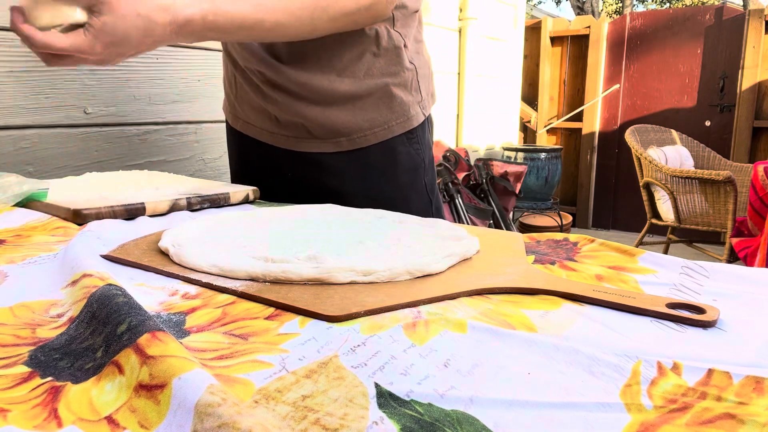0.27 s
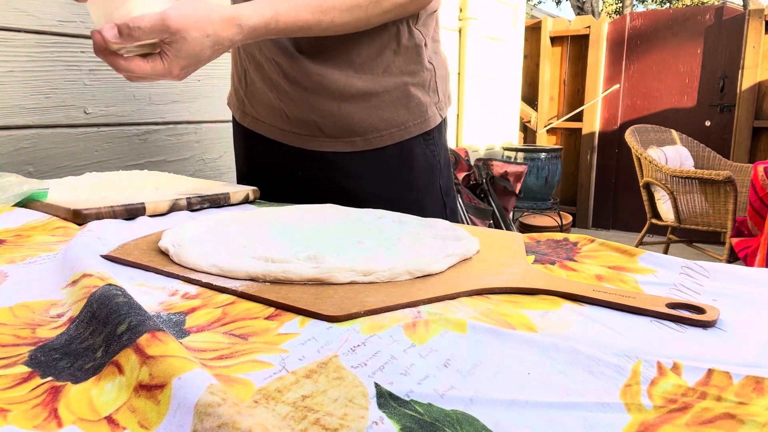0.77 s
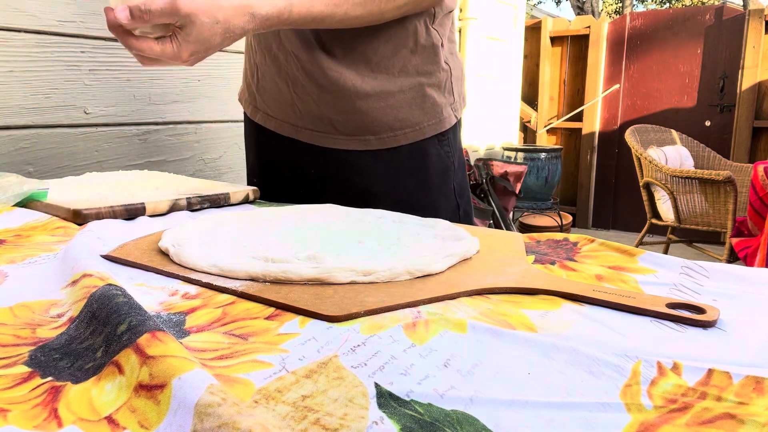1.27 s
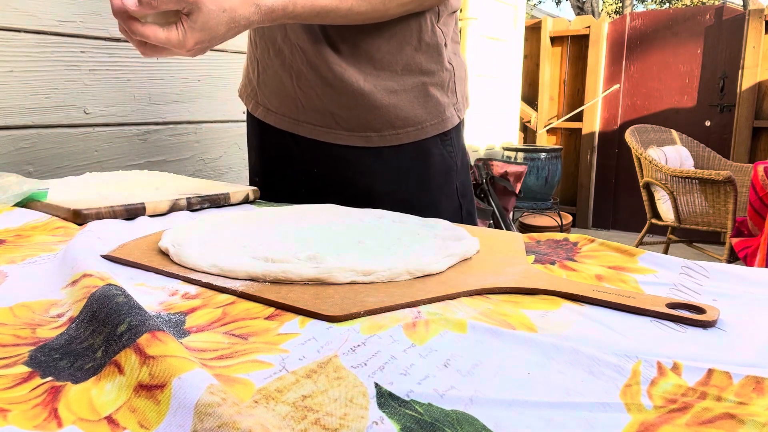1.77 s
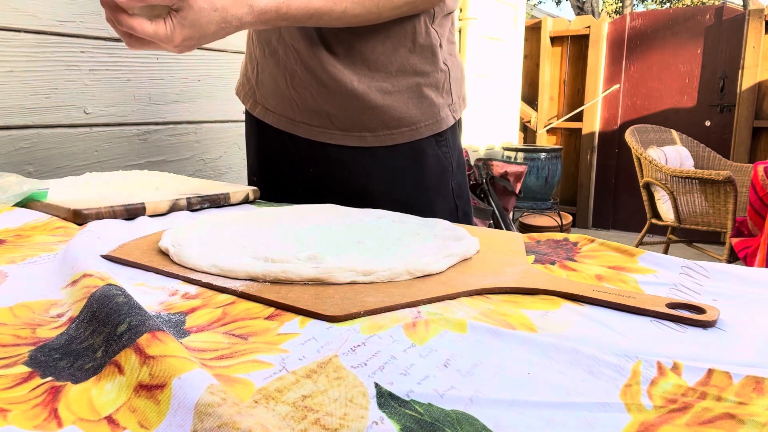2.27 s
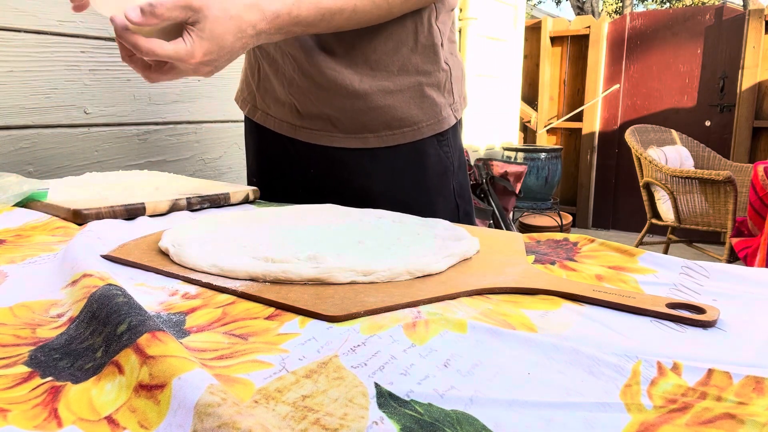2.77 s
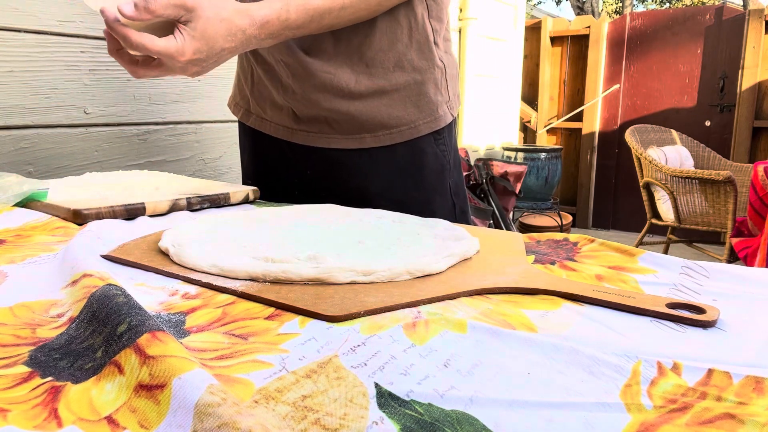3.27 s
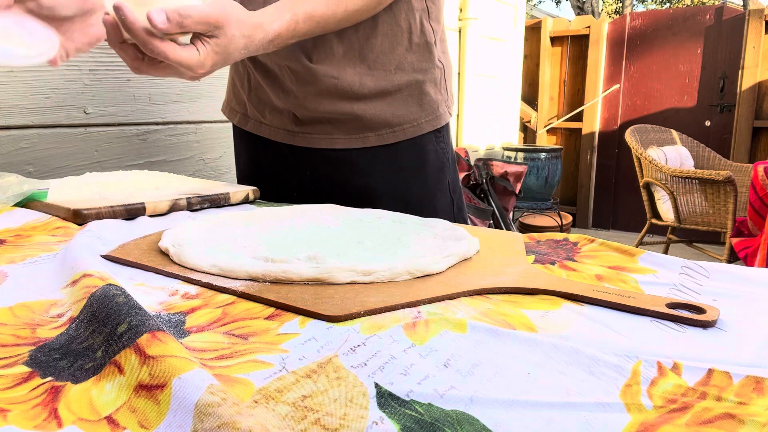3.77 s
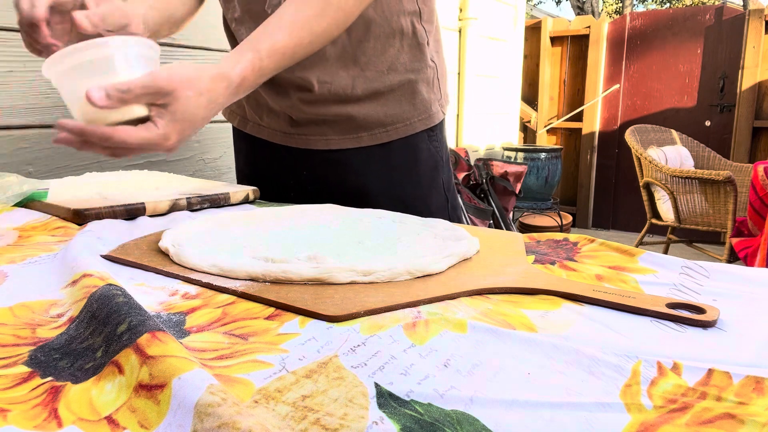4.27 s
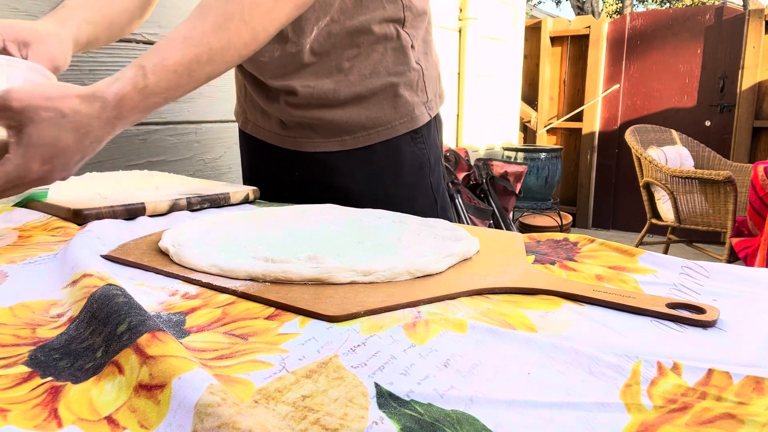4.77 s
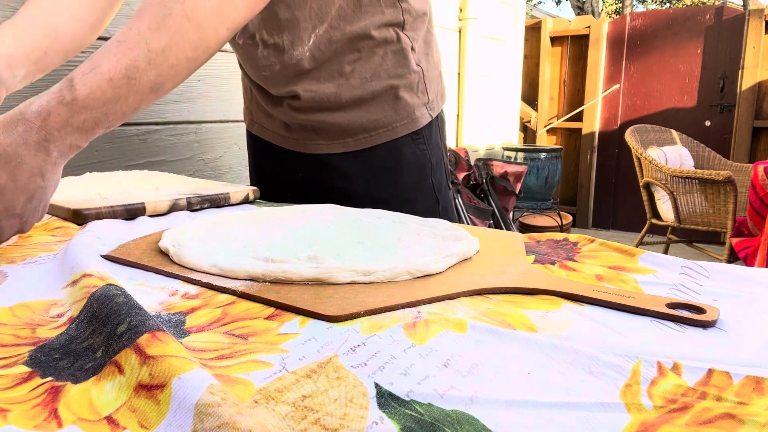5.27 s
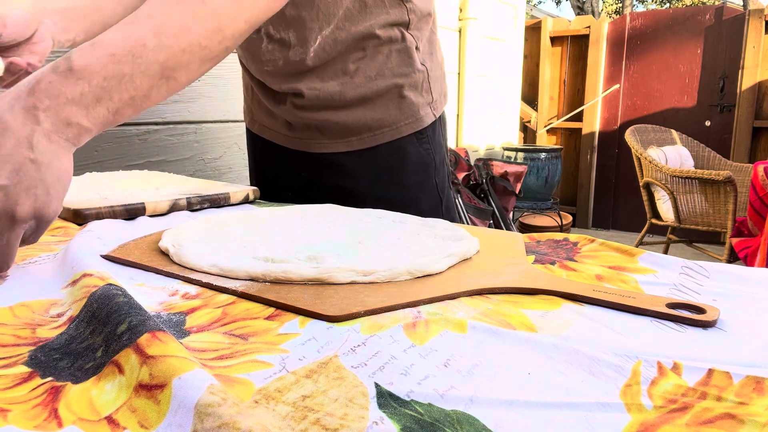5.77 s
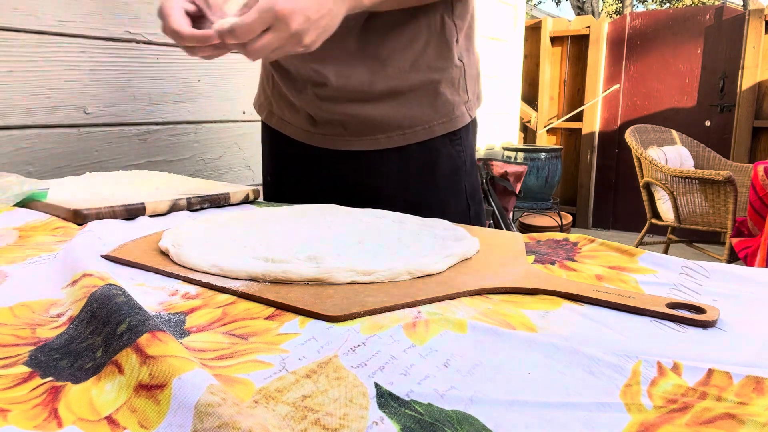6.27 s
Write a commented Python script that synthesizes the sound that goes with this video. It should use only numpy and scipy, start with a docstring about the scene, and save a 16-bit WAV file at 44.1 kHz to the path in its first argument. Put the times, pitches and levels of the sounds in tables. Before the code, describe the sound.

Quiet outdoor table work heard by a close stereo microphone. Soft skin-on-plastic strokes lead to a sudden lid pop at two seconds, a tight cluster of bright snaps past the middle, and a hard tumble of thuds and ticks as lid and tub land on the table. Faint squeaks, soft floury hiss and two duller bumps end it. Behind are low rumble, steady hum and a faraway power tool.

```python
"""Floury hands and a plastic tub outdoors

At an outdoor table, floured hands rub a thin plastic tub, prise off its lid and handle it with sharp snaps.
Strokes are shaped noise; snaps and their slaps from the house wall are bursts of slips over ringing modes;
the lid pop is a short rising swing in a brief hiss.
Lid and tub meet the cloth-covered table in dull knocks: falling thuds over ringing boards.
A motor hums in three partials; far off a power tool whines, sagging in pitch, and rasps over rumble and hiss.
"""
import sys
import numpy as np
from scipy import signal
from scipy.fft import rfft, irfft
from scipy.io import wavfile

SR = 44100
rng = np.random.default_rng(int(sys.argv[2]) if len(sys.argv) > 2 else 0)


def dump(signal):
    """Clip the signal to [-1, 1] and save it as 16-bit WAV at the path in sys.argv[1]."""
    limited = np.clip(np.atleast_2d(signal).T, -1, 1)
    pcm = np.round(limited * 32767).astype(np.int16)
    wavfile.write(sys.argv[1], SR, pcm)


N = 287973
T = np.arange(N) / SR
HIT_T = T[:SR // 2]   # half a second for each blow


# fingers and lid snapping on the tub, and the loudest snaps slapping back from the house wall:
# start_s, crack_db, rebound_db (relative to the crack), ring_db, cutoff_hz, decay_ms (of the crack),
# lead_ms (at the left ear)
SNAPS = [(0.6939, -31, -9, -48, 8500, 2.6, 0.43), (1.9020, -20, -8, -22, 11500, 0.82, 0.41),
         (2.0279, -32, -19, -22, 6000, 2.3, 0.31), (2.0319, -5.5, -17, -18.5, 11200, 0.8, 0.31),
         (2.0524, -27.5, -6, -48, 7000, 3.6, .35), (2.0642, -34, -2, -50, 5000, 1.5, 0.45),
         (2.225, -40, 4, -53, 6160, 8.9, 0.35), (3.246, -41, 1, -23.5, 1180, 5.9, 0.34),
         (3.546, -34.5, -9, -15, 4500, 7.1, 0.29), (3.5598, -11, -8, -1.5, 15000, 2.1, 0.31),
         (3.5634, -11, -17, -36, 7100, 1.1, .31), (3.5818, -20, -16, -16, 6500, 1.3, 0.11),
         (3.601, -34, -7, -48, 5000, 1.6, 0.23), (3.6054, -11, -3, -42, 11000, 1.8, 0.19),
         (3.6122, -12, -14, -24, 15700, 1.87, 0.098), (3.6146, -12.5, -9, -22, 7000, 1, .1),
         (4.1938, -12, -8, -17, 1540, 2.1, 0.17), (4.2011, -32, 9, -23, 2080, 1.3, 0.23)]
# resonances of the tub's thin walls: pitch_hz, level_db (relative), t60_s
TUB_MODES = [(484, -14, .05), (625, -16, .05), (738, -1.5, .04), (753, -21, .2), (886, -19, .06),
             (1039, -15, .05), (1222, -17, .045), (1459, -13, .035), (2212, -26, .11), (2694, -28, .12),
             (2921, -30, .12), (3166, -31, .12), (3386, -30, .11), (3537, -32, .11)]
WALL_BUILD_S, REBOUND_S = 0.0011, 0.0039   # the ring builds up; the second crack follows


def tub_snaps():
    """An edge slips with a crack, rings the walls and lands again; slaps from the house wall use the same recipe."""
    out = np.zeros((2, N))
    for start_s, crack_db, rebound_db, ring_db, cutoff_hz, decay_ms, lead_ms in SNAPS:
        walls = ring(TUB_MODES, spread_db=0) * (1 - np.exp(-HIT_T / WALL_BUILD_S))
        # a low cut-off leaves the high modes still, as under soft fingertips
        walls = butter(walls + 1e-18, cutoff_hz, "low")
        slip = from_db(crack_db) * crack(cutoff_hz, decay_ms)
        landing = from_db(crack_db + rebound_db) * crack(cutoff_hz, decay_ms)
        add(out, slip + from_db(ring_db) * walls, start_s, lead_ms)
        add(out, landing, start_s + REBOUND_S, lead_ms)
    return out


# tone of a crack: pitch_hz, level_db (relative)
CRACK_COLOUR = [(150, -10), (400, -2), (650, 6.5), (1100, 2), (1700, -3.5), (2500, -.5), (3500, -1),
                (4600, -5.5), (6500, -7.5), (8200, -23.5), (11000, -12), (16000, -17)]
CRUMBLE = 0.2   # size of the small slips that follow a crack, against its first slip


def crack(cutoff_hz, decay_ms):
    """A sharp slip and a dying crumble of smaller ones; unit rms over its decay time."""
    slips = CRUMBLE * rng.standard_normal(len(HIT_T)) * np.exp(-HIT_T * 1000 / decay_ms) + 1e-18
    slips[0] = 1
    sound = butter(colour(slips, CRACK_COLOUR), cutoff_hz, "low")
    return unit_burst(sound, decay_ms)


# the lid flipping through its bulge: centre_s, pitch_hz (at the centre), level_db, half_length_s (to 1/e)
POP = (2.0378, 330, -1.5, .0034)
# resonances of the air in the opened tub: pitch_hz, level_db (before the build-up), t60_s
CAVITY_MODES = [(298, -19, .12), (328, -20, .12), (440, -19, .12), (495, -9, .13), (572, -19, .09),
                (678, -25, .11), (754, -19, .11)]
POP_RISE_HZ_PER_S = 12000   # the lid tightens as it settles
POP_OCTAVE_DB = -13         # relative to the swing; the flip is abrupt at its turning points
SHOVE_SCALE_DB, SHOVE_S = -11, 0.0011   # air pushed aside; its pulse peaks about 7 dB below this scale
CAVITY_BUILD_S = 0.03       # the quivering lid keeps feeding the air


def lid_pop(lead_ms=0.13):
    """The freed lid swings through a few times, shoves the air aside and thumps the air in the tub."""
    out = np.zeros((2, N))
    centre_s, pitch_hz, level_db, half_length_s = POP
    t = T - centre_s
    phase = 2 * np.pi * (pitch_hz + POP_RISE_HZ_PER_S * t / 2) * t
    wave = np.cos(phase) + from_db(POP_OCTAVE_DB) * np.sin(2 * phase)
    swing = -from_db(level_db) * np.exp(-(t / half_length_s) ** 2) * wave
    shove = from_db(SHOVE_SCALE_DB) * t / SHOVE_S * np.exp(-(t / SHOVE_S) ** 2)
    thump = ring(CAVITY_MODES, spread_db=2) * (1 - np.exp(-HIT_T / CAVITY_BUILD_S))
    add(out, swing + shove, 0, lead_ms)
    add(out, thump, centre_s, lead_ms)
    return out


# things put down on the table, landing and rocking: start_s, thud_db, start_pitch_hz, swell_ms,
# ring_db (relative to the thud)
KNOCKS = [(4.0914, -2.5, 667, 3.7, -12), (4.099, -6.5, 222, 7.3, -22), (4.118, -13.5, 388, 9.1, -20),
          (4.173, -22, 605, 3.3, -6), (4.1929, -11.5, 990, 1.36, -4), (4.2021, -16, 630, 3, 0),
          (4.209, -24, 234, 8.2, -15), (5.641, -7.5, 454, 10.2, -5), (5.669, -25.5, 256, 8.5, -10),
          (5.9025, -27, 800, 3.5, -5), (5.915, -9.5, 197, 7.7, -3.5), (5.935, -25, 320, 8.1, -22),
          (5.954, -16, 624, 5.4, -14), (5.977, -25, 280, 6.6, -14)]
# resonances of the table top with its boards: pitch_hz, level_db (relative), t60_s
TABLE_MODES = [(48, -39, 0.073), (80, -20, 0.46), (144, -2, 0.12), (196, -7.5, 0.3), (260, -17, 0.11),
               (322, -8.5, 0.11), (438, -7, 0.09), (495, 9, 0.037), (730, -11, 0.078), (1052, -0.5, 0.065),
               (1161, -11, 0.093), (1230, 11, 0.018), (1607, -1, 0.065)]
THUD_LOW_HZ, THUD_GLIDE_S = 147, 0.0055   # high bending waves arrive first, so each thud falls to this pitch
# the whole top gives under a slow, heavy contact; the level is for a thud with this same swell
FLEX_HZ, FLEX_DB, FLEX_SWELL_MS = 66, -11.5, 10.7
CONTACT_REACH = 1.45     # the boards are driven up to this multiple of a thud's starting pitch
KNOCK_LEAD_MS = 0.32     # at the left ear


def table_knocks():
    """Each blow sends a falling thud through the top, which flexes and rings; harder contacts reach higher modes."""
    out = np.zeros((2, N))
    for start_s, thud_db, start_pitch_hz, swell_ms, ring_db in KNOCKS:
        pitch_hz = THUD_LOW_HZ + (start_pitch_hz - THUD_LOW_HZ) * np.exp(-HIT_T / THUD_GLIDE_S)
        thud = swell(swell_ms) * np.sin(2 * np.pi * np.cumsum(pitch_hz) / SR)
        flex_gain = from_db(FLEX_DB) * swell_ms / FLEX_SWELL_MS   # slower contacts bend the top more
        flex = flex_gain * swell(FLEX_SWELL_MS) * np.sin(2 * np.pi * FLEX_HZ * HIT_T)
        boards = ring(TABLE_MODES, spread_db=2) * (1 - np.exp(-HIT_T * 1000 / swell_ms)) + 1e-18
        for _ in range(2):   # twice for a steeper slope
            boards = butter(boards, CONTACT_REACH * start_pitch_hz, "low")
        add(out, from_db(thud_db) * (thud + flex + from_db(ring_db) * boards), start_s, KNOCK_LEAD_MS)
    return out


# hard plastic ticking against the table: start_s, level_db
TICKS = [(4.089, -23.5), (4.195, -49), (4.199, -27.5), (5.642, -45.5)]
# tone of a tick: pitch_hz, level_db (relative)
TICK_COLOUR = [(500, -11), (2200, -9), (3400, -11), (4500, -5.5), (6000, -11), (8000, -27), (11000, -39),
               (16000, -38)]
TICK_DECAY_MS, TICK_LEAD_MS = 1.9, 0.18   # the lead is at the left ear


def rim_ticks():
    """A rim meets the table with a thin, bright tick: a dying burst of coloured noise."""
    out = np.zeros((2, N))
    for start_s, level_db in TICKS:
        burst = rng.standard_normal(len(HIT_T)) * np.exp(-HIT_T * 1000 / TICK_DECAY_MS)
        tick = unit_burst(colour(burst, TICK_COLOUR), TICK_DECAY_MS)
        add(out, from_db(level_db) * tick, start_s, TICK_LEAD_MS)
    return out


# strokes of skin and lid on plastic, and a short hiss around the pop: peak_s, peak_db, swell_s, fade_s
RUBS = [(.28, -46.5, 0.035, 0.1), (.41, -45, 0.23, 0.2), (.47, -54, 0.11, 0.066), (.56, -53.5, 0.17, 0.26),
        (.695, -45, 0.044, 0.016), (2.03, -23, 0.0059, 0.013), (2.39, -54.5, 0.22, 0.35),
        (2.768, -44, 0.026, 0.057), (2.793, -47, 0.046, 0.04), (2.93, -53, 0.082, 0.036),
        (3.215, -53, 0.064, 0.1), (3.62, -31.5, 0.032, 0.049)]
# tone of the rubbing and the hiss: pitch_hz, level_db (relative)
RUB_COLOUR = [(400, -10), (1000, 0), (1600, -3.5), (2100, -2.5), (2600, 0.5), (3100, -3), (4500, -9),
              (6500, -11.5), (11000, -17.5), (16000, -20)]


def rubbing_and_pop_hiss():
    """Skin and lid slide over plastic with fine slips that catch and let go; a short hiss surrounds the pop."""
    return friction(RUBS, RUB_COLOUR, grain_db=0, catch_db=3, lead_ms=0.42)


# the tub dragging briefly against palm or cloth: peak_s, peak_db, swell_s, fade_s
SCUFFS = [(2.778, -41, 0.037, 0.049), (2.936, -40, 0.045, 0.027), (3.252, -42, 0.048, 0.065),
          (3.559, -25, 0.021, 0.05), (4.203, -27.5, 0.03, 0.045), (5.46, -50, .03, 0.064),
          (5.907, -33.5, .008, 0.029), (5.96, -62, .04, 0.035)]
# tone of the scuffs: pitch_hz, level_db (relative)
SCUFF_COLOUR = [(250, -17), (500, -10), (730, 3), (1100, -3.5), (1500, -21), (2200, -23.5), (5000, -60)]


def scuffing():
    """The tub drags with a dull, coarse grain of very uneven slips."""
    return friction(SCUFFS, SCUFF_COLOUR, grain_db=5, catch_db=0, lead_ms=0.3)


# a fingertip sticking and slipping in short pitched chirps: peak_s, pitch_hz, level_db,
# half_length_s (to 1/e), fall_db (per partial)
CHIRPS = [(0.482, 2590, -40.5, 0.0065, 30), (2.399, 754, -29, 0.0067, 24), (5.385, 463, -39.5, 0.0069, 9),
          (5.468, 479, -31.5, 0.011, 13)]
CHIRP_PARTIALS = 3


def chirps(waver_share=0.0153, lead_ms=0.32):
    """Skin catches and lets go at a nearly steady rate for a few hundredths of a second."""
    sound = 0
    for peak_s, pitch_hz, level_db, half_length_s, fall_db in CHIRPS:
        phase = 2 * np.pi * np.cumsum(pitch_hz * (1 + waver_share * drift(300))) / SR
        tone = sum(from_db(level_db - fall_db * k) * np.sin((k + 1) * phase)
                   for k in range(CHIRP_PARTIALS))
        sound = sound + tone * np.exp(-np.minimum(((T - peak_s) / half_length_s) ** 2, 20))
    return left_first(sound, lead_ms)


# fingers brushing through flour: peak_s, peak_db, swell_s, fade_s
FLOUR = [(5.46, -55, 0.17, 0.17), (5.66, -50, 0.3, 0.2), (5.74, -48, .08, 0.079), (5.86, -52, 0.12, 0.13)]
# tone of the flour: pitch_hz, level_db (relative)
FLOUR_COLOUR = [(1000, -10), (3000, -10.5), (5500, -11), (8000, -12), (12000, -16.5), (16000, -20)]


def flour_brushing():
    """Fingers brush through flour with a soft hiss of uneven grains."""
    return friction(FLOUR, FLOUR_COLOUR, grain_db=3, catch_db=2, lead_ms=0.18)


def friction(rows, spectrum, grain_db, catch_db, lead_ms):
    """Countless tiny slips of uneven size (grain) under strokes that keep catching and letting go (catch)."""
    unevenness_db = grain_db * drift(900) + catch_db * drift(60)
    slips = rng.standard_normal(N) * from_db(unevenness_db)
    return left_first(strokes(rows) * rms_one(colour(slips, spectrum)), lead_ms)


STROKE_RANGE_DB = 20   # a stroke rises and falls this far within its swell and fade times


def strokes(rows):
    """Gain of strokes that each swell to a peak and fade, evenly in dB; the loudest one wins."""
    gains = []
    for peak_s, peak_db, swell_s, fade_s in rows:
        distance = np.maximum((peak_s - T) / swell_s, (T - peak_s) / fade_s)
        gains.append(from_db(peak_db - STROKE_RANGE_DB * distance))
    return np.max(gains, axis=0) + 1e-9


# scatter in bands: low_hz, high_hz (limited to 0.45 of the sample rate), level_db, t60_s
PATIO = [(96, 700, -27.5, 0.37), (730, 5700, -13, 0.048), (2880, 6700, -24, 0.21), (7000, 34000, -37, 0.19)]


def patio(x, echo_s=0.023, echo_db=-19, echo_cut_hz=6000, build_s=0.0001):
    """One slap from the house wall and a short scatter from fence and furniture."""
    tail = np.zeros((2, len(HIT_T)))
    for low_hz, high_hz, level_db, t60_s in PATIO:
        band = butter(rng.standard_normal(tail.shape), [low_hz, high_hz], "band")
        band *= from_db(-60 * HIT_T / t60_s) * (1 - np.exp(-HIT_T / build_s))
        tail += from_db(level_db) * band / np.sqrt(np.sum(band ** 2, axis=1, keepdims=True))
    slap = np.array([delay(ear, echo_s) for ear in butter(x, echo_cut_hz, "low")])
    scatter = signal.oaconvolve(x, tail, axes=1)[:, :N]
    return from_db(echo_db) * slap + scatter


# the hum's first three partials, before panning and flutter: time_s, first_db, second_db, third_db
HUM_LEVEL = [(0, -39.5, -53, -64), (1.95, -39.5, -52.5, -61), (2.2, -50, -53, -61), (2.7, -50.5, -53, -61),
             (3.4, -45, -53.5, -60), (3.8, -38.5, -54, -58), (4.6, -36.5, -57, -54), (5.3, -34.8, -59, -56),
             (6.53, -34.5, -58, -54)]
HUM_HZ, HUM_SAG_HZ_PER_S = 158.7, 1   # starting pitch; the motor slows steadily
HUM_FLUTTER_DB = 0.7


def motor(wobble_hz=0.21, pan_db=2.0):
    """A hum of three partials, a little stronger on the left, slowly sags in pitch as the motor slows."""
    pitch_hz = HUM_HZ - HUM_SAG_HZ_PER_S * T + wobble_hz * drift(7.74)
    phase = 2 * np.pi * np.cumsum(pitch_hz) / SR
    hum = 0
    for k, level_db in enumerate(in_time(HUM_LEVEL), 1):
        hum = hum + from_db(level_db + HUM_FLUTTER_DB * drift(2.5)) * np.sin(k * phase)
    return hum * from_db([[pan_db], [-pan_db]])


# the distant tool's speed and whine, before panning and flutter: time_s, pitch_hz, level_db
TOOL = [(0, 551, -52), (.25, 532, -57), (.6, 524, -57), (2, 521, -57), (3.5, 517, -60), (4.3, 509, -53),
        (4.8, 499, -53), (5.05, 506, -57), (5.4, 527, -54), (5.9, 528, -54), (6.53, 521, -57)]
# resonances of the workpiece: pitch_hz, width_hz (of one filter pass), level_db (relative filter gain)
RASP_PEAKS = [(432, 10, 10), (765, 70, 6), (1113, 22, 4), (1405, 16, 1), (1650, 25, -3), (1757, 7, 8),
              (2018, 12, 5.5), (2055, 8, 3), (2125, 8, -1), (2180, 8, -2), (2282, 9, 0), (2450, 20, 1),
              (2562, 8, -2), (2698, 10, -1), (2770, 24, -4), (2955, 8, 0), (1900, 900, -20)]
WHINE_FLUTTER_DB = 2.2
RASP_IDLE_DB, RASP_RISE_DB = -71, 13   # running free, before panning; added at full load


def power_tool(wobble_hz=0.78, pan_db=6.5):
    """A whine follows the tool's speed; a rasp rises under load in the workpiece. Right leads, left is louder."""
    pitch_hz, level_db = in_time(TOOL)
    phase = 2 * np.pi * np.cumsum(pitch_hz + wobble_hz * drift(16)) / SR
    whine = from_db(level_db + WHINE_FLUTTER_DB * drift(10)) * np.sin(phase)
    rasp = 0
    for peak_hz, width_hz, peak_db in RASP_PEAKS:
        b, a = signal.iirpeak(peak_hz, peak_hz / width_hz, SR)
        band = rng.standard_normal(N)
        for _ in range(2):   # twice: steep flanks
            band = signal.lfilter(b, a, band)
        rasp = rasp + from_db(peak_db) * band
    rasp = from_db(RASP_IDLE_DB + RASP_RISE_DB * tool_load()) * rms_one(rasp)
    return right_first(whine + rasp, lead_ms=0.32) * from_db([[pan_db], [-pan_db]])


# the tool bites slowly and is lifted quickly
CUT_START_S, CUT_BITE_S, CUT_END_S, CUT_RELEASE_S = 0.038, 1.95, 5.19, 0.18


def tool_load():
    """How hard the distant tool works, 0-1: attack, hold, release."""
    bite = (T - CUT_START_S) / CUT_BITE_S
    release = (CUT_END_S - T) / CUT_RELEASE_S
    return np.clip(np.minimum(bite, release), 0, 1)


# tone of the air: pitch_hz, level_db (per Hz, relative)
AIR_COLOUR = [(20, -22.5), (48, 6), (75, 0), (110, -5.5), (180, -4), (250, -10.5), (500, -15), (700, -17.5),
              (1300, -27), (3000, -31.5), (6500, -37.5), (11000, -39), (16000, -45.5)]
# left-right likeness of the air: pitch_hz, likeness (0-1)
AIR_LIKENESS = [(50, 1), (250, 0.58), (600, 0.16), (2000, 0.051), (12000, 0.24)]
AIR_DB, AIR_RISE_DB = -44.5, 2   # at rest; added by the tool's broad noise at full load


def outdoor_air(lead_ms=0.43):
    """Distant rumble and hiss: a shared noise reaching the right ear first, mixed with separate noise per ear."""
    alike = np.clip(at_hz(AIR_LIKENESS, np.fft.rfftfreq(N, 1 / SR)), 0, 1)
    shared = rfft(right_first(rng.standard_normal(N), lead_ms))
    separate = rfft(rng.standard_normal((2, N)))
    noise = irfft(np.sqrt(alike) * shared + np.sqrt(1 - alike) * separate, N)
    coloured = np.array([colour(ear, AIR_COLOUR) for ear in noise])
    air = rms_one(butter(coloured, 54.7, "high"))
    return from_db(AIR_DB + AIR_RISE_DB * tool_load()) * air


def from_db(db):
    """Decibels to gain."""
    return 10 ** (np.asarray(db) / 20)


def rms_one(x):
    """Scale to unit rms."""
    return x / np.sqrt(np.mean(x ** 2) + 1e-20)


def unit_burst(x, decay_ms):
    """Scale a burst so that its energy gives unit rms over its decay time."""
    return x / np.sqrt(np.sum(x ** 2) / (SR * decay_ms / 1000))


def in_time(rows):
    """Each column of a curve at every sample."""
    time_s, *columns = np.transpose(rows)
    return [np.interp(T, time_s, column) for column in columns]


def at_hz(points, hz):
    """Read a spectrum on a log-frequency axis."""
    point_hz, value = np.transpose(points)
    return np.interp(np.log(hz + 1), np.log(point_hz), value)


def colour(x, points):
    """Causal (minimum-phase) filter with the given dB spectrum."""
    size = 2048
    gain = from_db(at_hz(points, np.fft.rfftfreq(size, 1 / SR)))
    cepstrum = irfft(np.log(gain))
    # fold the cepstrum forward in time
    cepstrum[1:size // 2] *= 2
    cepstrum[size // 2 + 1:] = 0
    return signal.oaconvolve(x, irfft(np.exp(rfft(cepstrum))))[:len(x)]


def butter(x, hz, kind):
    """Butterworth low-, high- or band-pass of design order two."""
    sos = signal.butter(2, np.clip(hz, 10, 0.45 * SR), kind, fs=SR, output="sos")
    return signal.sosfilt(sos, x)


def delay(x, seconds):
    """The same sound, later by whole samples."""
    count = int(round(abs(seconds) * SR))
    return np.pad(x, (count, 0))[:len(x)]


def left_first(x, lead_ms):
    """A source that reaches the left ear first."""
    return np.array([x, delay(x, lead_ms / 1000)])


def right_first(x, lead_ms):
    """A source that reaches the right ear first."""
    return np.array([delay(x, lead_ms / 1000), x])


def add(out, sound, start_s, lead_ms):
    """Put a sound in at its start, reaching the left ear first."""
    for ear, ear_s in zip(out, (start_s, start_s + lead_ms / 1000)):
        i = int(round(ear_s * SR))
        ear[i:i + len(sound)] += sound[:N - i]


def ring(modes, spread_db):
    """Struck modes, neighbours moving in opposite senses; a spread shares each blow's energy differently."""
    sound = 0
    for k, (pitch_hz, level_db, t60_s) in enumerate(modes):
        mode_db = level_db + spread_db * rng.standard_normal() - 60 * HIT_T / t60_s
        sound = sound + (-1) ** k * from_db(mode_db) * np.sin(2 * np.pi * pitch_hz * HIT_T)
    return sound


def drift(rate_hz):
    """Straight lines between random points of spread 1, drawn at the given rate."""
    points = rng.standard_normal(8192)
    return np.interp(T * rate_hz, np.arange(len(points)), points)


def swell(peak_ms):
    """A smooth rise to 1 and a slower fall."""
    age = HIT_T * 1000 / peak_ms
    return (age * np.exp(1 - age)) ** 2


# shading of the right ear: pitch_hz, gain_db
FAR_EAR = [(60, -1.5), (170, -4.3), (500, -5), (1000, -3.3), (2200, -1), (5000, 0)]


def scene():
    """The hands work left of the microphone, in front of the outdoor sounds."""
    handling = tub_snaps() + lid_pop() + table_knocks() + rim_ticks()
    touching = rubbing_and_pop_hiss() + scuffing() + chirps() + flour_brushing()
    left, right = handling + touching
    near = np.array([left, colour(right, FAR_EAR)])
    return near + patio(near) + motor() + power_tool() + outdoor_air()


CUTOFF_HZ = 16300


def record(dry):
    """The tallest peaks are rounded and the top is cut steeply."""
    rounded = dry / (1 + dry ** 6) ** (1 / 6)
    return signal.sosfilt(signal.ellip(10, 0.1, 80, CUTOFF_HZ, fs=SR, output="sos"), rounded)


dry = scene()
out = record(dry)
dump(out)
```